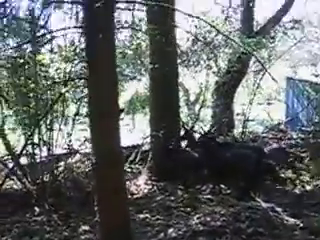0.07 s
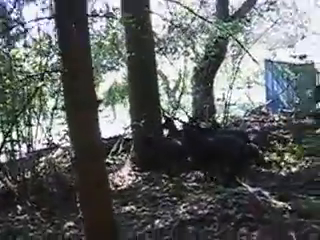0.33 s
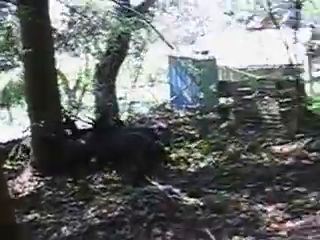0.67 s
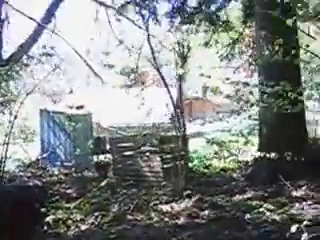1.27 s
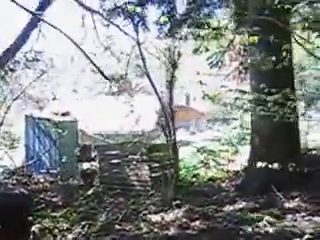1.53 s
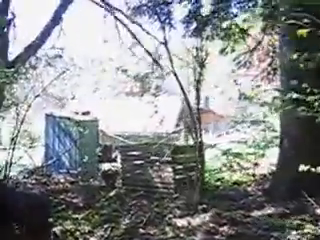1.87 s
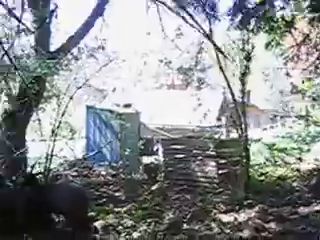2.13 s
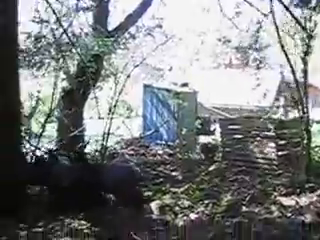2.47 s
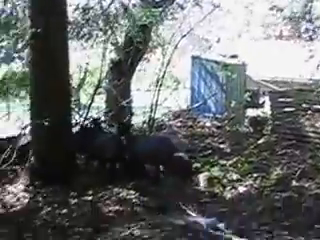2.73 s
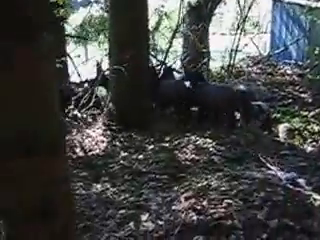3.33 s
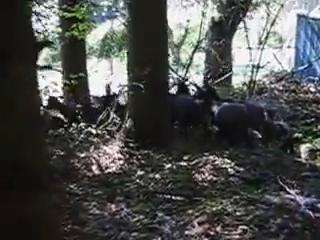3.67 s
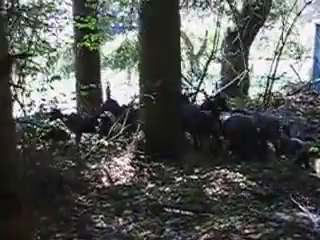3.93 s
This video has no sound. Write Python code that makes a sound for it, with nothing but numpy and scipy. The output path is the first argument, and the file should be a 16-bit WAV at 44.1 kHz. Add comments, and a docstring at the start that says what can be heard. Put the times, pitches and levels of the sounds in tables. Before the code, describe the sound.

Fingers knock, rub and thud on a hand-held camera in a breezy wood. A grip slips with a small snap early on, and the hardest knocks come later. Leaves rustle throughout while wind rumbles on the microphone.

```python
"""Fingers knock on a hand-held camera, ringing its casing, as it is swung about in a breezy wood.
They rub, scrape and thud on it too, and one grip slips with a squeak and a bright snap.
Behind them a leafy rush swells, crackles and fades, and wind buffets the microphone.
After each hard knock the gain control ducks the rush and lets it creep back."""
import sys
import numpy as np
from scipy import signal
from scipy.fft import rfft, irfft, next_fast_len
from scipy.io import wavfile
from scipy.ndimage import uniform_filter1d, map_coordinates

SR = 44100
rng = np.random.default_rng(int(sys.argv[2]) if len(sys.argv) > 2 else 0)


def transcribe(u):
    """Save the signal u as a 16-bit wav file named by the first command-line argument.

    u: samples, shape (n,) or (channels, n), limited to [-1, 1]; the rate is SR.
    q: integer samples, one column per channel.
    """
    v = np.clip(np.atleast_2d(u).T, -1, 1)
    q = np.round(v * 32767).astype(np.int16)
    wavfile.write(sys.argv[1], SR, q)


N = 176400


def amp(db):
    """Decibels to gain."""
    return 10 ** (np.asarray(db) / 20)


def unit(x):
    """Scale to rms 1."""
    return x / np.sqrt(np.mean(x ** 2) + 1e-20)


def clock(length=N):
    """The time of each sample, in seconds."""
    return np.arange(length) / SR


def curve(rows):
    """A fader ride: (time_s, value) rows joined by straight lines."""
    return np.interp(clock(), *np.transpose(rows))


def wobble(knots_per_s):
    """A smooth random drift."""
    return map_coordinates(rng.standard_normal(4096), [clock() * knots_per_s], mode="wrap")


def equalise(x, eq, top_hz=SR / 2):
    """Shape x with (freq_hz, gain_db) points and cut everything above top_hz."""
    size = next_fast_len(N + 8192)
    hz = np.fft.rfftfreq(size, 1 / SR)
    freq_hz, gain_db = np.transpose(eq)
    gain = amp(np.interp(np.log(hz + 1), np.log(freq_hz), gain_db))
    return irfft(rfft(x, size) * gain * (hz < top_hz), size)[:N]


def noise(eq):
    """Coloured noise of rms 1."""
    return unit(equalise(rng.standard_normal(N), eq))


def patchy_noise(eq, patchy_db):
    """Coloured noise of rms 1 with brief patches of random gain across the spectrum."""
    spectrogram = signal.stft(rng.standard_normal(N), nperseg=256)[2]
    patches = uniform_filter1d(rng.standard_normal(spectrogram.shape), size=5, axis=0)
    patches = unit(uniform_filter1d(patches, size=5, axis=1))
    mottled = signal.istft(spectrogram * amp(patchy_db * patches), nperseg=256)[1][:N]
    return unit(equalise(mottled, eq))


def decay(t, t60_s):
    """An exponential tail that starts at t = 0."""
    return (t >= 0) * np.exp(-np.log(1000) * np.abs(t) / t60_s)


def ring(t, pitch_hz, t60_s):
    """One damped mode."""
    return np.sin(2 * np.pi * pitch_hz * t) * decay(t, t60_s)


def add(out, start_s, sound):
    """Mix a short sound in at start_s."""
    part = out[round(start_s * SR):][:len(sound)]
    part += sound[:len(part)]


# Fader ride of the wind on the microphone: time_s, level_db
BUFFET_RIDE = [(0.0, -43.5), (0.2, -47.5), (0.24, -41), (0.4, -46.5), (0.44, -23.5), (0.66, -39.5),
               (0.74, -36.5), (0.82, -37.5), (1.42, -33.5), (1.52, -43), (1.72, -35), (1.78, -46),
               (3.34, -42.5), (3.42, -37), (3.88, -33.5), (4.0, -55.5)]
# Its sub-heavy tone: freq_hz, gain_db
BUFFET_EQ = [(8, -4), (20, -0.5), (33, -0.5), (55, -6.5), (80, -7), (120, -17.5), (200, -23), (500, -39.5)]


def wind_buffet():
    """Air buffets the microphone with a lumpy low rumble."""
    lumps = amp(1.9 * wobble(14))
    return amp(curve(BUFFET_RIDE)) * unit(lumps * noise(BUFFET_EQ))


# Fader rides of the rush's midrange body and treble hiss, before their trims: time_s, level_db
BODY_RIDE = [(0, -34.5), (0.06, -28.5), (0.15, -35.5), (0.4, -38.5), (0.57, -32), (0.68, -36.5),
             (0.88, -43), (1.02, -28.5), (1.07, -35.5), (1.13, -33.5), (1.3, -39.5), (1.53, -37.5),
             (1.63, -35.5), (1.82, -30.5), (1.96, -35.5), (2.03, -36.3), (2.25, -37.5), (2.47, -33),
             (2.6, -30.5), (2.8, -31), (2.9, -30), (3.02, -36.8), (3.26, -29.5), (3.42, -36.5), (3.52, -34),
             (3.62, -30), (3.72, -35.5), (4, -35.5)]
HISS_RIDE = [(0, -33), (0.06, -32.3), (0.15, -38.5), (0.4, -40.5), (0.57, -34.5), (0.68, -40), (0.88, -44),
             (1.02, -33), (1.07, -36.5), (1.13, -34.5), (1.3, -41.5), (1.53, -40.0), (1.63, -36),
             (1.82, -30.5), (1.96, -32.5), (2.03, -36.0), (2.25, -37.5), (2.47, -29.5), (2.6, -29),
             (2.8, -28), (2.9, -28.5), (3.02, -34), (3.26, -29), (3.42, -34), (3.52, -36.5), (3.62, -29),
             (3.72, -35), (4, -34.5)]
# Tone of the body and of the hiss: freq_hz, gain_db
BODY_EQ = [(60, -11), (160, -8), (300, -3), (550, -2.5), (800, -1.5), (1050, -1), (1400, -1), (1700, -6.5),
           (2100, -15.5), (3500, -31)]
HISS_EQ = [(200, -22.5), (900, 2), (1800, -1.5), (2500, 1), (3300, 1.5), (4000, 0.5), (4900, 0.5),
           (5400, -2), (6200, -9)]


def leafy_rush(body_trim_db=-1.67, hiss_trim_db=1):
    """Wind rustles the leaves: a midrange body and a finer hiss flutter together."""
    flutter_db = 0.87 * wobble(45)
    body_db = curve(BODY_RIDE) + body_trim_db + flutter_db + 0.56 * wobble(130)
    body = amp(body_db) * patchy_noise(BODY_EQ, patchy_db=2.0433)
    hiss_db = curve(HISS_RIDE) + hiss_trim_db + flutter_db + 1.8 * wobble(300)
    hiss = amp(hiss_db) * patchy_noise(HISS_EQ, patchy_db=1.5)
    return body + hiss


def crackle(ticks_per_s=43, centre_hz=1190, pitch_spread=0.35, t60_cycles=10, scatter_db=3, trim_db=0.5):
    """Small random ticks in the rush swell and fade with its body."""
    out, t = np.zeros(N), clock(SR // 30)
    starts_s = rng.uniform(0, N / SR, 512)[:int(ticks_per_s * N / SR)]
    for start_s, (detune, strength) in zip(starts_s, rng.standard_normal((512, 2))):
        pitch_hz = centre_hz * np.exp(pitch_spread * detune)
        add(out, start_s, amp(scatter_db * strength) * ring(t, pitch_hz, t60_cycles / pitch_hz))
    return out * amp(curve(BODY_RIDE) + trim_db)


# Soft, low thuds of the hand: start_s, level_db, pitch_hz, t60_s
HAND_BUMPS = [(0.256, -22, 109.3, 0.035), (.52, -26, 75, .06), (1.21, -22, 75.6, 0.079),
              (1.249, -26.5, 138.7, .06), (1.391, -23.5, 65, 0.054), (1.883, -19, 90.2, 0.046),
              (2.131, -26, 45.3, 0.045), (2.461, -24, 290, 0.029), (2.711, -15, 240, 0.028),
              (3.44, -24.5, 55, 0.08), (3.65, -24, 80, 0.068), (3.707, -22, 65.5, 0.055)]


def hand_bumps():
    """The hand nudges the camera; each dull thud is one damped mode."""
    out, t = np.zeros(N), clock(SR // 5)
    for start_s, level_db, pitch_hz, t60_s in HAND_BUMPS:
        add(out, start_s, amp(level_db) * ring(t, pitch_hz, t60_s))
    return out


def casing_rub(length_s=0.26, slips_per_s=60, centre_hz=1283, t60_s=0.0157, first_db=-19,
               fade_db_per_s=25):
    """An opening stutter: something drags over the casing in uneven, fading slips."""
    out, t = np.zeros(N), clock(SR // 30)
    slips = rng.standard_normal((64, 3))[:int(length_s * slips_per_s)]
    for k, (late, detune, strength) in enumerate(slips):
        start_s = abs(k + 0.26 * late) / slips_per_s
        level_db = first_db - fade_db_per_s * start_s + 0.5 * strength
        pitch_hz = centre_hz * np.exp(0.14 * detune)
        add(out, start_s, amp(level_db) * ring(t, pitch_hz, t60_s))
    return out


# Short finger scrapes: start_s, level_db, t60_s
FINGER_SCRAPES = [(0.593, -21.5, 0.036), (2.7255, -5, 0.029), (2.8683, -7, 0.026), (2.879, -8, .032)]
# Their gritty tone: freq_hz, gain_db
GRIT_EQ = [(150, -17.5), (900, 5), (1800, -3.5), (2500, 2), (4500, 1), (6000, -4.5)]


def finger_scrapes():
    """Fingers shift on the casing in short bursts of grit."""
    envelope = sum(amp(level_db) * decay(clock() - start_s, t60_s)
                   for start_s, level_db, t60_s in FINGER_SCRAPES)
    return envelope * noise(GRIT_EQ)


SNAP_S = 0.4347
# The narrow, squeaky tone of the slipping grip: freq_hz, gain_db
SQUEAK_EQ = [(300, -22.5), (1400, -13), (2900, -11.5), (3250, -9), (3480, 0.5), (3700, -10), (4500, -16.5),
             (6000, -24)]


def grip_snap(squeak_db=-15.5, swell_s=0.0081, crack_db=-11, ping_db=-4.5):
    """A grip slips with a swelling squeak, then lets go with a bright ringing click."""
    t = clock() - SNAP_S
    squeak = amp(squeak_db) * (t < 0) * np.exp(-np.abs(t) / swell_s) * noise(SQUEAK_EQ)
    crack = amp(crack_db) * decay(t, t60_s=0.0024) * noise(GRIT_EQ)
    ping = amp(ping_db) * ring(t, pitch_hz=3470, t60_s=0.013)
    return squeak + crack + ping


# Resonances of the casing: pitch_ratio, gain_db
CASING_MODES = [(.28, -8.5), (.55, -2), (1, 2), (1.5, -4), (2.05, -3.5)]
# Finger hits on the casing: start_s, level_db, pitch_hz, t60_s, crack_db (relative to the hit)
FINGER_KNOCKS = [(0.0471, -14.5, 1204, 0.00775, -15), (.4795, -21.5, 1150, 0.0237, -24),
                 (.6955, -17.5, 905, 0.0092, -16.5), (0.819, -16, 337, 0.0169, -23),
                 (0.911, -26.5, 402, 0.015, -9), (1.104, -20.5, 1040, 0.0185, -18),
                 (1.217, -24, 1020, 0.009, -13.5), (1.8748, -9, 1336, 0.0055, 0),
                 (1.894, -4.5, 587, 0.0088, -1), (2.4893, -7, 686.8, 0.015, -6),
                 (2.4919, -8.5, 780, 0.017, -7), (2.612, -11.5, 784, 0.0073, -20),
                 (2.71, -2.5, 696, 0.01058, -23.5), (2.782, -12, 558, 0.013, -20),
                 (3.772, -14, 914, 0.012, -18), (3.866, -21, 1100, 0.01, -17.5)]


def finger_knocks(crack_t60_s=0.01, low_cut_hz=170):
    """Each knock rings the casing's modes briefly, in alternating polarity, with a noisy crack on top."""
    out, t = np.zeros(N), clock(SR // 10)
    for start_s, level_db, pitch_hz, t60_s, crack_db in FINGER_KNOCKS:
        tone = sum((-1) ** k * amp(gain_db) * ring(t, pitch_hz * pitch_ratio, t60_s)
                   for k, (pitch_ratio, gain_db) in enumerate(CASING_MODES))
        crack = amp(crack_db) * decay(t, crack_t60_s) * rng.standard_normal(len(t))
        add(out, start_s, amp(level_db) * (tone + crack))
    return signal.lfilter(*signal.butter(1, low_cut_hz, "high", fs=SR), out)


def scene():
    """The mono mix at the microphone: wind bed, handling noise and fine texture."""
    wind_bed = leafy_rush() + wind_buffet()
    handling = finger_knocks() + finger_scrapes() + hand_bumps() + grip_snap()
    return (wind_bed + handling + crackle() + casing_rub())[None]


def gain_control(x, threshold_db=-19.5, sense_s=0.002816, attack_s=0.00175, release_db_per_s=14.5):
    """Loud hits duck the gain fast and shift the zero line; both creep back at a steady rate."""
    power = np.abs(uniform_filter1d(x ** 2, round(sense_s * SR)))
    over_db = np.maximum(10 * np.log10(power + 1e-12) - threshold_db, 0)
    ramp_db = release_db_per_s * clock()
    held_db = np.maximum.accumulate(over_db + ramp_db) - ramp_db  # each peak falls at the release rate
    pole = np.exp(-1 / (attack_s * SR))
    cut_db = signal.lfilter([(1 - pole) ** 2], np.poly([pole, pole]), held_db)
    zero_shift = -0.0031 * cut_db
    return x * amp(-cut_db) + zero_shift


# The camera's steep treble roll-off: freq_hz, gain_db
CAMERA_EQ = [(5000, 1), (5450, -1), (5750, -7), (6000, -15), (6250, -33.5)]


def record(dry, band_hz=6350, tick_db=-15.5, top_hz=16000):
    """The camera narrows the band and rides the gain; a thin, bright one-sample tick tops the snap."""
    ducked = gain_control(equalise(dry[0], CAMERA_EQ))
    heard = equalise(ducked, [(1, 0.0068)], band_hz)  # flat up to a brick-wall cut
    add(heard, SNAP_S, amp([tick_db]))  # reaches above the band
    return equalise(heard, [(7000, 0.5), (14000, -2.5), (16000, -13.5)], top_hz)[None]


dry = scene()
out = record(dry)
transcribe(out)
```